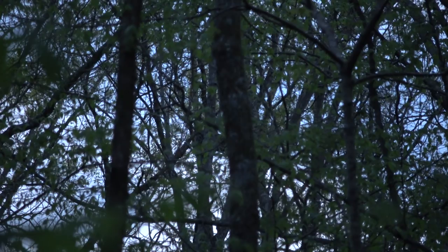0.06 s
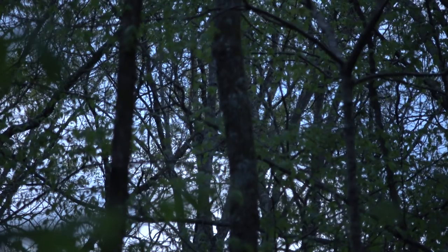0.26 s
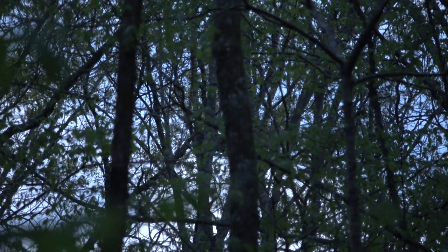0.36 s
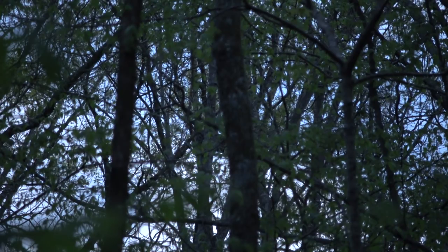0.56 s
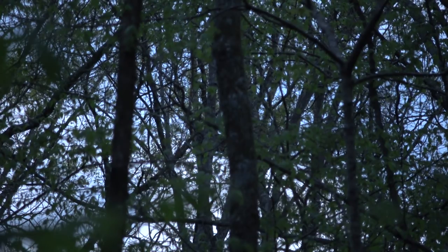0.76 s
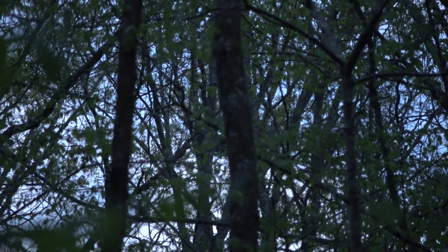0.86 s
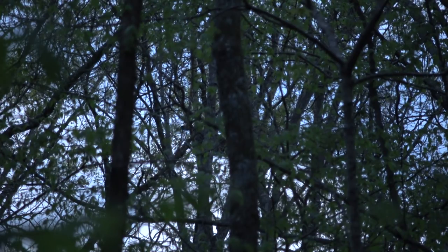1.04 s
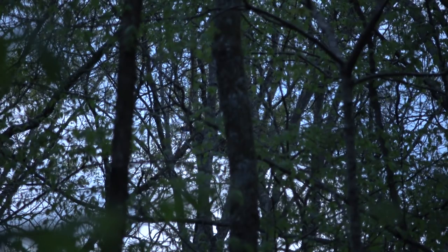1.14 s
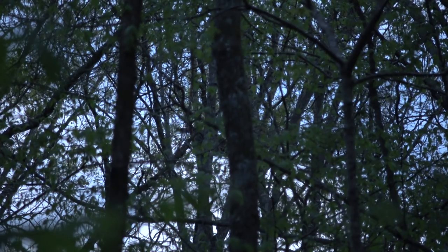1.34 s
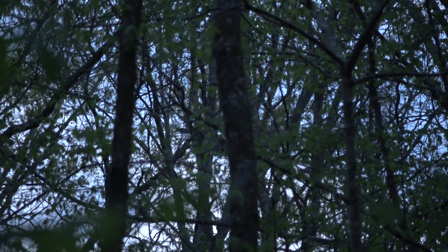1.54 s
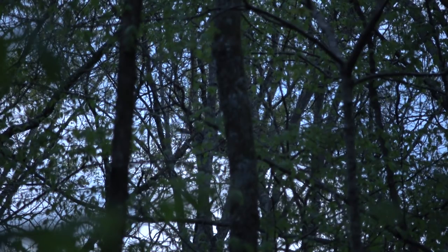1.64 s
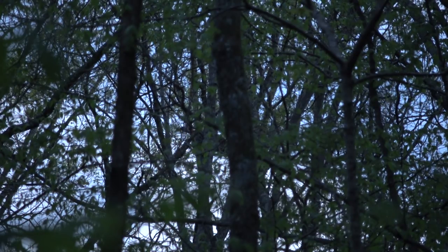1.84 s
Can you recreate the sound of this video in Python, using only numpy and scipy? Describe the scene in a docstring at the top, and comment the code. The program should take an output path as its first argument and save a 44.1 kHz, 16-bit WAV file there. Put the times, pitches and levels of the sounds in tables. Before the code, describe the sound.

Close owl hooting: a brief arched note, a longer fluttering call ending hoarsely, then soft throat puffs

```python
"""Quiet woodland at dusk, an owl close by: one short arched hoot, then a long call that arches, dips,
holds a pure high note and sinks in a flutter to a rasp. Soft puffs of air from its throat follow.
Harmonic pulses and pulsed breath through one throat filter make the hoots; noise in resonances makes
the rasp, gasp and puffs, and swept sines the thin whistles. Decaying noise makes the trees' faint echo."""
import sys
import numpy as np
from scipy import signal
from scipy.fft import rfft, irfft, next_fast_len
from scipy.io import wavfile
from scipy.ndimage import uniform_filter1d, map_coordinates

SR = 44100
rng = np.random.default_rng(int(sys.argv[2]) if len(sys.argv) > 2 else 0)


def materialize(psi):
    """Save the field psi as 16-bit PCM at rate SR to the path in sys.argv[1].

    A 1-D psi becomes a single channel; in a 2-D psi each row is a channel.
    """
    bounded = np.clip(np.atleast_2d(psi).T, -1, 1)
    quanta = np.round(bounded * 32767).astype(np.int16)
    wavfile.write(sys.argv[1], SR, quanta)


N = 83790
T = np.arange(N) / SR
CUTOFF_HZ = 15700  # upper limit of the overtones and of the output

# flutter depth: time_s, pitch_swing_share
FLUTTER_DEPTH = [(.886, 0.004), (.896, .115), (1.04, .115), (1.1, 0.0028)]


def from_db(db):
    """Decibels to amplitude gain."""
    return 10 ** (np.asarray(db) / 20)


def rms_one(x):
    """Scale to unit power."""
    return x / np.sqrt(np.mean(x ** 2) + 1e-20)


def curve(rows, axis=1):
    """One table column, interpolated linearly in time."""
    rows = np.array(rows)
    return np.interp(T, rows[:, 0], rows[:, axis])


def envelope(rows):
    """Gain from a table's last column (dB), silent outside it, smoothed over 130 samples."""
    rows = np.array(rows)
    level_db = np.interp(T, rows[:, 0], rows[:, -1], left=-200, right=-200)
    return uniform_filter1d(from_db(level_db), size=130)


def drift(hz):
    """Low-passed noise of unit power: slow random variation."""
    lowpass = signal.butter(2, hz, fs=SR, output="sos")
    settled = signal.sosfilt(lowpass, rng.standard_normal(2 * N))[N:]
    return rms_one(settled)


def colour(x, points):
    """Minimum-phase filter through (Hz, dB) points, built by folding the cepstrum."""
    size = 2 * next_fast_len(N)
    hz, db = np.transpose(points)
    grid_hz = np.maximum(np.arange(size // 2 + 1) * SR / size, 1)
    grid_db = np.interp(np.log(grid_hz), np.log(hz), db)
    cepstrum = irfft(np.log(from_db(grid_db)))
    cepstrum[1:size // 2] *= 2
    cepstrum[size // 2 + 1:] = 0
    response = np.exp(rfft(cepstrum))
    return irfft(rfft(x, size) * response)[:N]


def evened(x, size):
    """Hold the running power, smoothed twice over size samples, near one."""
    power = uniform_filter1d(uniform_filter1d(x * x, size), size)
    return x / np.sqrt(np.abs(power) + 1e-12)


def blown(modes, stretch=1):
    """Turbulent air in resonances, each a core and a broad skirt; stretch scales pitch; unit power."""
    skirt_db = -11
    out = 0
    for hz, width_hz, db in modes:
        for spread, gain in ((1, 1), (3, from_db(skirt_db))):
            edges_hz = hz * np.exp(spread * width_hz / hz * np.array([-.5, .5]))
            edges_hz = np.clip(edges_hz, hz / 2, hz * 2)
            bandpass = signal.butter(2, edges_hz, "band", fs=SR, output="sos")
            band = signal.sosfilt(bandpass, rng.standard_normal(2 * N))
            out = out + from_db(db) * gain * evened(band, size=700)
    read_position = np.cumsum(stretch * np.ones(N))  # reading faster raises the pitch
    return rms_one(map_coordinates(out, [read_position], order=3))


def woodland_air():
    """Steady coloured noise: the still wood."""
    air_db = -54.5
    # background spectrum: frequency_hz, level_db
    air_spectrum = [(60, 0), (300, -13.5), (540, -3.5), (720, -6.5), (1080, -5), (1400, -16.5), (3000, -25),
                    (5500, -38.5), (15500, -45)]
    return from_db(air_db) * rms_one(colour(rng.standard_normal(N), air_spectrum))


def woodland_echo(x):
    """Many weak reflections from trunks: noise that builds up, then decays exponentially."""
    echo_db, t60_s, build_up_s = -37, 1.9, .045
    # echo colour: frequency_hz, level_db
    echo_spectrum = [(150, -17.5), (850, 3), (3000, -1), (6000, -13.5)]
    decay = from_db(-60 * T / t60_s)
    build_up = 1 - np.exp(-(T / build_up_s) ** 2)
    scatter = rng.standard_normal(N) * decay * build_up
    echo = signal.fftconvolve(x, scatter / np.linalg.norm(scatter))[:N]
    return from_db(echo_db) * colour(echo, echo_spectrum)


def puffs():
    """Throat pumps small puffs of air over a soft rush; its resonances sink as it relaxes."""
    attack_s, release_s = .0025, .004  # half of each puff's half length adds to the release
    hiss_wander_share, hiss_wander_hz = .02, 8.3
    # puffs: centre_s, half_length_s, level_db, hiss_re_body_db
    puff_rows = [(1.17, 0.0089, -41.5, -5.5), (1.236, 0.0046, -44.5, -12.5), (1.289, 0.0067, -39.5, -10),
                 (1.314, 0.0073, -42.5, -10.5), (1.34, 0.016, -46, -7.5), (1.419, 0.0068, -42.5, -17),
                 (1.45, 0.014, -52, -7), (1.508, 0.013, -49.5, -12), (1.577, 0.0091, -43, -13.5),
                 (1.652, 0.02, -50, -10), (1.717, 0.0076, -43, -11.5), (1.787, 0.017, -48.5, -12.5),
                 (1.854, 0.0078, -46, -12.5)]
    # resonances of puff body, hiss and rush: frequency_hz, width_hz, level_db
    body_modes = [(584.4, 41.4, -1.5), (930, 52, -5), (1620, 300, -14.5)]
    hiss_modes = [(1800, 240, -1.5), (3309, 108, 1.5), (3280, 840, -1), (4720, 480, -13.5)]
    rush_modes = [(1010, 280, 6), (2000, 1300, -9), (4350, 334, -19.5)]
    # rush level: time_s, level_db
    rush_level = [(1.16, -47.5), (1.34, -51), (1.39, -54), (1.48, -50.5), (1.56, -57), (1.9, -63)]
    # throat relaxation: time_s, resonance_factor
    relaxation = [(1.3, 1.12), (1.55, 0.99), (1.9, .95)]

    stretch = curve(relaxation)
    body_gain, hiss_gain = 0, 0
    for centre_s, half_s, db, hiss_db in puff_rows:
        opening = .5 + .5 * np.tanh((T - centre_s + half_s) / attack_s)
        since_release_s = np.maximum(T - centre_s - half_s / 2, 0)
        swell = from_db(db) * opening * np.exp(-since_release_s / (release_s + half_s / 2))
        body_gain = body_gain + swell
        hiss_gain = hiss_gain + swell * from_db(hiss_db)
    body = body_gain * evened(blown(body_modes, stretch), size=500)
    hiss = hiss_gain * blown(hiss_modes, 1 + hiss_wander_share * drift(hiss_wander_hz))
    rush = envelope(rush_level) * blown(rush_modes, stretch)
    return body + hiss + rush


def air_in_call():
    """Air noise in the call: rumble under the flutter, thin arched whistles and the closing gasp."""
    rumble_db = -56
    sag_share, waver_share, waver_hz = .18, .022, 600
    # whistles: centre_s, half_length_s, top_hz, level_db
    whistle_rows = [(.267, .04, 4500, -71), (.704, .022, 6380, -68.5)]
    # gasp level: time_s, level_db
    gasp_level = [(1.125, -44), (1.15, -34), (1.177, -45)]
    # gasp resonances: frequency_hz, width_hz, level_db
    gasp_modes = [(691.7, 54.2, -3.5), (1253.5, 207, -3.5)]

    depth = curve(FLUTTER_DEPTH)
    out = from_db(rumble_db) * depth / depth.max() * blown([(77, 240, 0)])
    for centre_s, half_s, top_hz, db in whistle_rows:
        arch = np.cos(np.pi / 2 * np.clip((T - centre_s) / half_s, -1, 1))
        pitch_hz = top_hz * (1 - sag_share * (1 - arch ** 2) + waver_share * drift(waver_hz))
        out = out + from_db(db) * arch * np.sin(2 * np.pi * np.cumsum(pitch_hz) / SR)
    return out + envelope(gasp_level) * evened(blown(gasp_modes), size=500)


def overtones(pitch_hz, phase, orders):
    """Chosen harmonics of the syrinx's pulses, falling per octave, kept below the cutoff."""
    fall_db_per_octave = 3
    out = 0
    for k in orders:
        audible = k * pitch_hz < CUTOFF_HZ
        out = out + from_db(-fall_db_per_octave * np.log2(k)) * np.cos(k * phase) * audible
    return out


def voice():
    """Syrinx pulses and breath through the throat: rough when low, nearly a sine when high, then hoarse."""
    flutter_hz, crest_s, squareness, flutter_level_db = 23.3, .9105, 1.9, 2.4
    dwell = .25  # offset: longer on crests than in dips
    rough_below_hz, jitter_share, clear_jitter_share, shimmer_share = 380, .012, .0005, .1
    # rising notes lose breath and top overtones first, then the lower ones
    clear_from_hz, clear_loss_db = 472, 10
    pure_from_hz, pure_loss_db, transition_hz = 515, 6, 10
    breath_db, clear_breath_db = -30.5, -13  # second is added on clear notes
    rasp_top_hz, bass_cut_hz = 4120, 90
    # short hoot, long call without flutter: time_s, pitch_hz, level_db
    hoot = [(.186, 215, -56), (.195, 232.5, -22.5), (.202, 311.7, -21), (.21, 388.1, -18),
            (.22, 429.2, -17), (.23, 499.5, -17.5), (.245, 538, -18.5), (.265, 601, -16.5), (.28, 589, -15),
            (.29, 545, -18.5), (.3, 373, -20.5), (.31, 297.2, -20), (.32, 244.6, -26.5),
            (.33, 173.6, -27.5), (.346, 147, -52)]
    long_call = [(.516, 223.8, -58), (.525, 268.3, -21.5), (.537, 391.8, -19.5), (.55, 436.5, -16.5),
                 (.567, 486.6, -17), (.59, 497.6, -18.5), (.604, 472.4, -17), (.615, 372.6, -18.5),
                 (.63, 279.5, -23), (.642, 208.3, -23.5), (.654, 210, -24.5), (.666, 328.4, -19.5),
                 (.685, 513.6, -17.5), (.705, 591.2, -17), (.8, 600.3, -16.5), (.84, 593.2, -17.5),
                 (.882, 564, -19.5), (.895, 371.9, -20), (.93, 356.1, -22), (1.085, 296.5, -25),
                 (1.103, 252, -23.5), (1.116, 191.3, -26.5), (1.135, 142.6, -30.5), (1.155, 115, -48)]
    # throat and beak, breath before the throat: frequency_hz, level_db
    throat = [(110, -0.5), (290, -7.5), (500, 4.5), (780, -3), (1000, -8), (1075, -19), (1125, -6),
              (1330, -9.5), (1490, -19.5), (1680, -34), (2270, -29), (2650, -44.5), (3100, -38),
              (3450, -49.5), (3850, -37), (4450, -56.5), (7000, -72)]
    breath_spectrum = [(250, -16.5), (1300, 0), (2500, 19.5), (11000, 28)]
    # middle overtones in pure notes, overtone strength (slack in the flutter): time_s, level_db
    pure_swell = [(.75, -2.5), (.8, 4.5), (.87, -1)]
    pressed = [(.66, 3), (.95, -2), (1.04, -3.5), (1.1, 1.5)]
    # hoarse last slow pulses: time_s, level_db
    rasp_level = [(1.095, -54), (1.11, -45), (1.16, -50)]
    # rasp resonances: frequency_hz, width_hz, level_db
    rasp_modes = [(1750, 310, -0.5), (3596, 250, -8)]

    depth = curve(FLUTTER_DEPTH)
    cycle = np.cos(2 * np.pi * flutter_hz * (T - crest_s))
    flutter = depth * np.tanh(squareness * (cycle + dwell))
    pitch_hz = curve(hoot + long_call) * (1 + flutter)

    rough = 1 / (1 + (pitch_hz / rough_below_hz) ** 6)
    clear = .5 + .5 * np.tanh((pitch_hz - clear_from_hz) / transition_hz)
    pure = .5 + .5 * np.tanh((pitch_hz - pure_from_hz) / transition_hz)
    jitter = (jitter_share * rough + clear_jitter_share) * drift(120)
    phase = 2 * np.pi * np.cumsum(pitch_hz * (1 + jitter)) / SR

    second = overtones(pitch_hz, phase, [2])
    middle = from_db(curve(pure_swell) * pure) * overtones(pitch_hz, phase, range(3, 6))
    high = overtones(pitch_hz, phase, range(6, 40))
    upper = from_db(-pure_loss_db * pure) * (second + middle) + from_db(-clear_loss_db * clear) * high
    shimmer = 1 + shimmer_share * rough * drift(200)
    pulses = (np.cos(phase) + from_db(curve(pressed)) * upper) * shimmer
    tone = evened(colour(pulses, throat), size=380)

    opening = 1 + np.cos(phase)  # air flows once per pulse
    breath = colour(rng.standard_normal(N) * opening, breath_spectrum)
    breath = rms_one(colour(breath, throat))
    breath_gain = from_db(breath_db + clear_breath_db * clear)

    level = envelope(hoot) + envelope(long_call)
    level = level * from_db(flutter_level_db * flutter / depth.max())
    call = level * (tone + breath_gain * breath)

    rasp_lowpass = signal.butter(10, rasp_top_hz, fs=SR, output="sos")
    rasp = signal.sosfilt(rasp_lowpass, blown(rasp_modes) * opening)
    bass_cut = signal.butter(2, bass_cut_hz, "high", fs=SR, output="sos")
    return signal.sosfilt(bass_cut, call + envelope(rasp_level) * rms_one(rasp))


def scene():
    """The owl, its echo and the still wood, in one channel."""
    owl = voice() + air_in_call() + puffs()
    mix = owl + woodland_echo(owl) + woodland_air()
    return mix[None]


def record(dry):
    """Steep elliptic low-pass at the cutoff."""
    lowpass = signal.ellip(10, .1, 70, CUTOFF_HZ, fs=SR, output="sos")
    return signal.sosfilt(lowpass, dry)


dry = scene()
out = record(dry)
materialize(out)
```